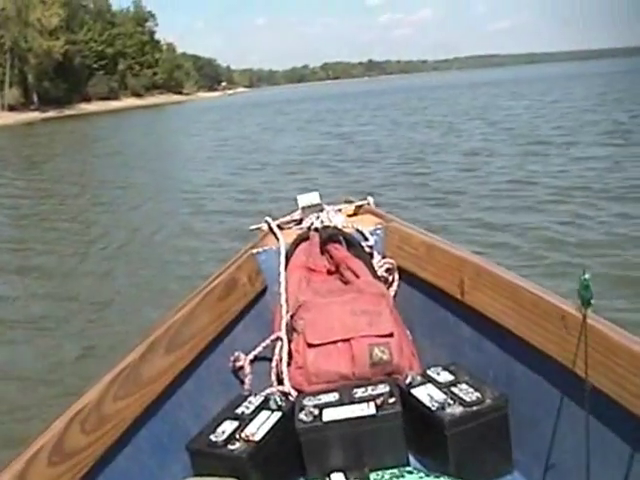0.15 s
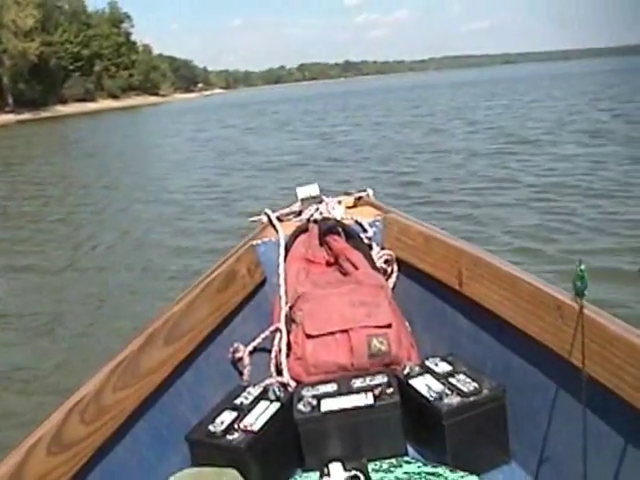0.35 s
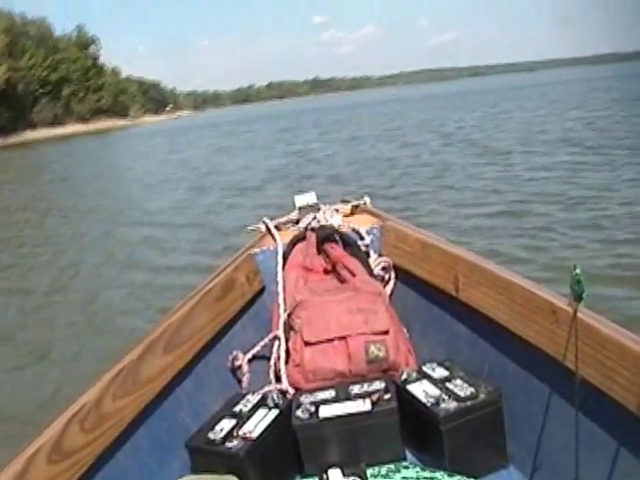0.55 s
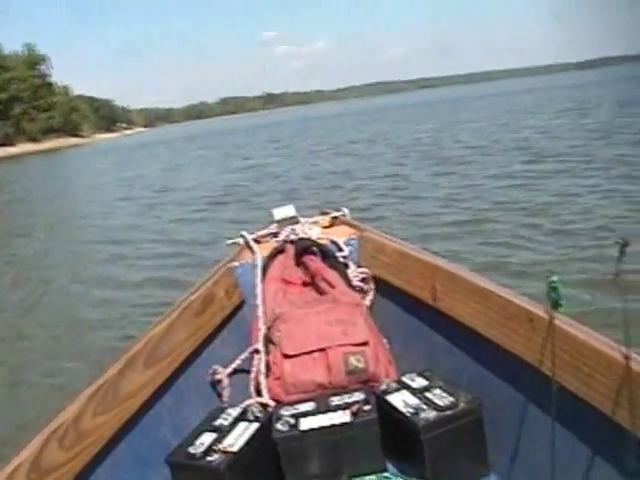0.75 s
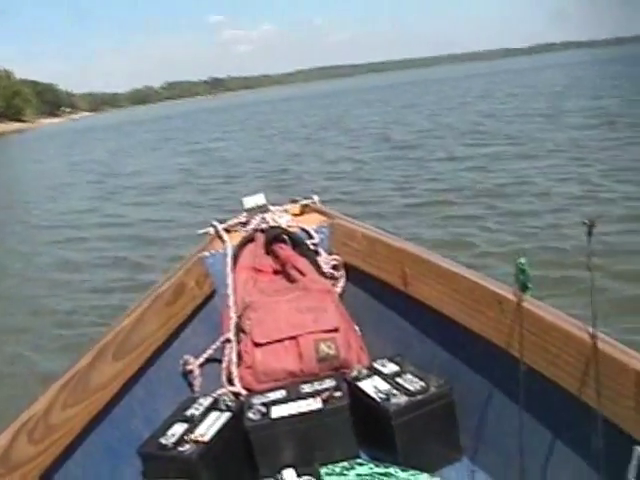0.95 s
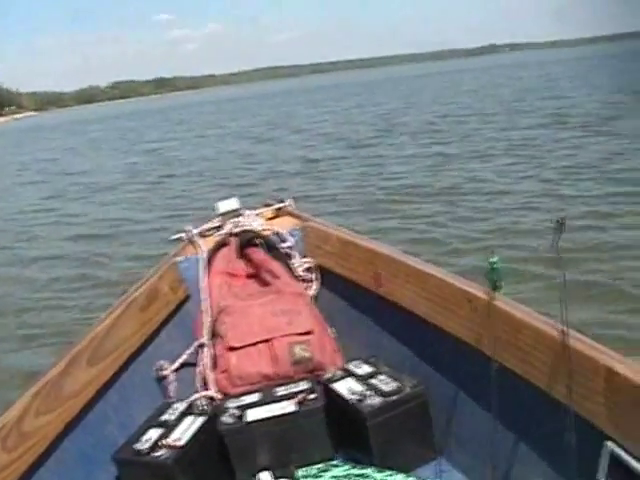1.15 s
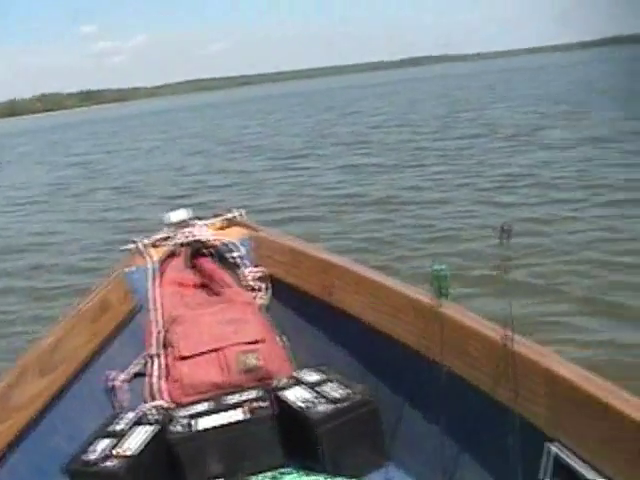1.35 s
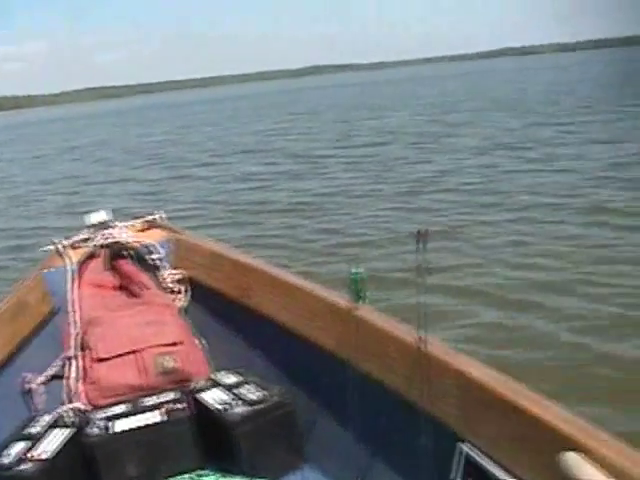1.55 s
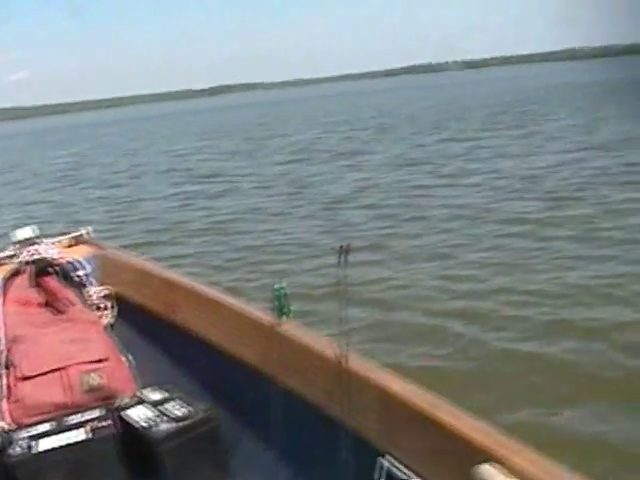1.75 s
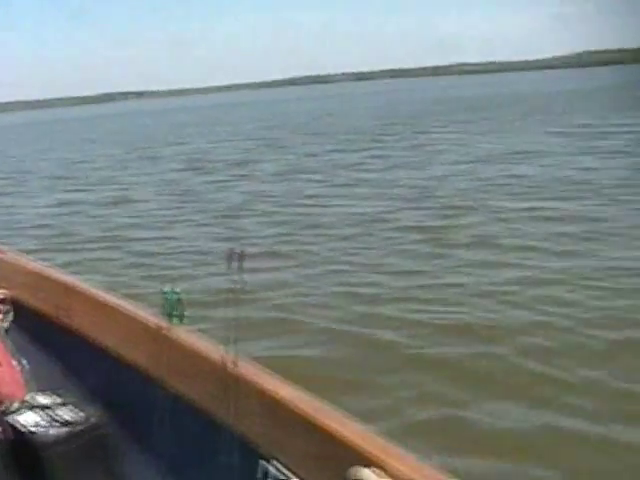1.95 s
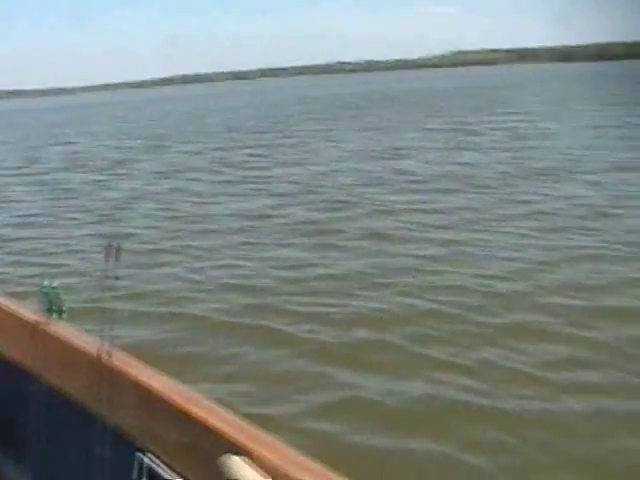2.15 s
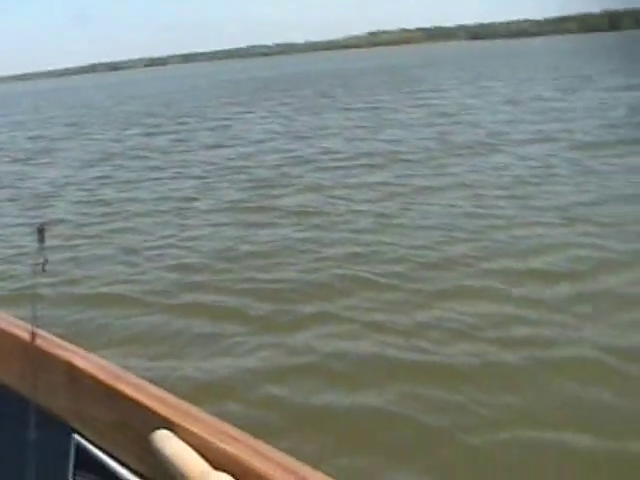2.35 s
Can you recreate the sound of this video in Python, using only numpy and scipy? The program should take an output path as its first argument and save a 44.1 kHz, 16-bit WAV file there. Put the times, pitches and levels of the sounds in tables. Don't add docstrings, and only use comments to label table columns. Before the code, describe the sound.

A small boat's electric outboard revs loudly, heard close in stereo outdoors. Soft hum and water wash come first, with wind slaps around 0.15-0.3 s. At about 0.3 s a harsh, rattling gear whine climbs fast, peaks at 0.4-0.6 s, then plunges, its metal housing ringing until about 1.2 s. Hull gurgles dot 0.8-2 s; wind fades and the steady hum grows slightly to the end.

```python
import sys
import numpy as np
from scipy import signal
from scipy.fft import rfft, irfft, next_fast_len
from scipy.io import wavfile
from scipy.ndimage import uniform_filter1d, map_coordinates

SR = 44100
rng = np.random.default_rng(int(sys.argv[2]) if len(sys.argv) > 2 else 0)


def inscribe(sig):
    pcm = np.round(np.clip(np.atleast_2d(sig).T, -1, 1) * 32767)
    wavfile.write(sys.argv[1], SR, pcm.astype(np.int16))


def linear_from_db(decibels):
    return 10 ** (np.asarray(decibels, float) / 20)


N = 105840
TIME = np.arange(N) / SR


def rms(x):
    return np.sqrt(np.mean(x ** 2) + 1e-20)


def unit(x):
    return x / rms(x)


def over_time(points, outside=None):
    s, value = np.transpose(points)
    return np.interp(TIME, s, value, left=outside, right=outside)


def over_pitch(points, hz):
    f, value = np.transpose(points)
    return np.interp(np.log(hz + 1), np.log(f + 1), value)


def wobble(rate):
    knots = rng.standard_normal(int(N * rate / SR) + 4)
    return map_coordinates(knots, [TIME * rate])


def filtered(x, response):
    m = next_fast_len(N + SR // 2)
    return irfft(rfft(x, m) * response(np.fft.rfftfreq(m, 1 / SR)), m)[..., :N]


def resonances(peaks):
    def response(f):
        total = 0
        for k, (centre, width, db) in enumerate(peaks):
            damping = 1j * f * width
            total = total + (-1) ** k * linear_from_db(db) * damping / (centre ** 2 - f ** 2 + damping)
        return total
    return response


def coloured(spectrum):
    return lambda f: linear_from_db(over_pitch(spectrum, f))


def noise(response, grain_db=0):
    grain = linear_from_db(grain_db * np.array([wobble(300), wobble(300)]))
    return unit(filtered(grain * rng.standard_normal((2, N)), response))


def tone(hz, db):
    phase = 2 * np.pi * np.cumsum(hz) / SR
    return linear_from_db(db) * np.sqrt(2) * np.sin(phase + np.array([[0], [np.pi / 2]]))


# pitch_hz, lead_radians
PORT_LEAD = [(700, 0), (1500, 0.41), (3000, 0.92), (4500, 0.26), (6200, 0.59)]


def spread(pair, alike, left_db):
    def mid_side(f):
        angle = np.arccos(np.clip(over_pitch(alike, f), -1, 1)) / 2
        return np.array([np.cos(angle), np.sin(angle)])

    def tilt(f):
        half = linear_from_db(over_pitch(left_db, f) / 2) * np.exp(.5j * over_pitch(PORT_LEAD, f))
        return np.array([half, 1 / half])

    mid, side = filtered(pair, mid_side)
    both = filtered(np.array([mid + side, mid - side]), tilt)
    return both / rms(both.mean(0)) * rms(pair[0])


# start_s, level_db
GEAR_EFFORT = [
    (.25, -56),
    (.282, -23.5),
    (.33, -17),
    (.385, -10.5),
    (.62, -12.5),
    (.72, -18.5),
    (.95, -28),
    (1.2, -38.5),
    (1.5, -58.5),
]
# start_s, pitch_hz
MOTOR_SPEED = [
    (.25, 450),
    (.34, 750),
    (.38, 812),
    (.42, 900),
    (.47, 968),
    (.595, 994),
    (.62, 830),
    (.665, 420),
    (.75, 200),
]
# pitch_hz, likeness
REV_ALIKE = [(300, .9), (900, .97), (2500, .9), (6000, .85), (8000, .4)]
# pitch_hz, level_db
REV_LEFT = [(400, 0), (1000, -1), (2400, 7.5), (5000, 7.5), (9000, 2)]


def rev():
    effort = linear_from_db(over_time(GEAR_EFFORT, -90) + .6 * wobble(20))
    speed = uniform_filter1d(over_time(MOTOR_SPEED), size=900)
    gears = housing() + gear_whistle(speed) + shaft_tones(speed)
    return spread(effort * gears + propeller() + bell() + flares(), REV_ALIKE, REV_LEFT)


# pitch_hz, width_hz, level_db
LOADED_MODES = [(1130, 24, -8), (1730, 43, -5), (2150, 35, -6), (2570, 45, -4), (2730, 49, -4),
                (3010, 62, -6), (3220, 38, -7), (3530, 37, -7), (3940, 33, -8), (4160, 35, -9),
                (4410, 61, -7), (5470, 47, -8), (5620, 35, -9), (6050, 67, -14)]
# pitch_hz, width_hz, level_db
COASTING_MODES = [(980, 15, -6), (1140, 41, -6), (1440, 35, -10), (1880, 37, -9), (2090, 42, -7),
                  (2540, 37, -8), (2720, 35, -7), (2990, 70, -11), (3630, 40, -16), (3940, 33, -14),
                  (4420, 55, -16), (5010, 28, -17), (5500, 76, -18), (6030, 44, -24)]
# pitch_hz, density_db
LOADED_RATTLE = [(180, -62.5), (300, -7.5), (536, -4), (801, -7), (972, 0), (1290, -8.5), (1690, -4.5),
                 (2990, -7), (6570, -16), (8540, -60), (14500, -120)]
# pitch_hz, density_db
COASTING_RATTLE = [(180, -39), (300, -15), (341, -17), (454, 0.5), (770, -15), (1120, 0.5), (1360, -0.5),
                   (4290, -11), (6570, -25.5), (8540, -70), (14500, -120)]
# start_s, end_s
UNLOADS = (.6, 0.74)
# start_s, end_s
BRIGHTENS = (.265, .34)


def housing():
    start, end = UNLOADS
    late = np.clip((TIME - start) / (end - start), 0, 1)

    def unload(loaded, coasting):
        before = np.sqrt(1 - late) * noise(loaded, grain_db=1)
        return before + linear_from_db(5) * np.sqrt(late) * noise(coasting, grain_db=2.5)

    ring = unload(resonances(LOADED_MODES), resonances(COASTING_MODES))
    rattle = unload(coloured(LOADED_RATTLE), coloured(COASTING_RATTLE))
    casing = linear_from_db(-4.5) * ring + linear_from_db(-2.5) * rattle
    bright = np.interp(TIME, BRIGHTENS, [0, 1])
    dull = filtered(casing, lambda f: 1 / (1 + (f / 2800) ** 2))
    return bright * casing + (1 - bright) * dull


# multiple of main tone, driven_db, coasting_db, roughness_hz, gain_db per decade of speed
SHAFT_TONES = [(1, -5, -36, 4, 100), (1.78, -24, -30, 8, 60), (3.04, -16, -15, 6, 120),
               (3.58, -10, -13, 8, 15), (4.62, -19, -19, 20, 30), (5.62, -19, -18, 40, 5),
               (5.8, -17, -16, 45, 0)]


def shaft_tones(speed):
    power_cut_s, release_s = .603, .013
    coast = np.clip((TIME - power_cut_s) / release_s, 0, 1)
    decades = np.log10(speed / speed.max())
    total = 0
    for order, driven_db, coasting_db, rough_hz, grow_db in SHAFT_TONES:
        hz = order * speed + rough_hz * wobble(60)
        db = driven_db + (coasting_db - driven_db) * coast
        db = db + (grow_db * (1 - coast) + 6 * coast) * decades
        db = db + 2.2 * wobble(30) + .45 * order * wobble(260)
        total = total + tone(hz, db)
    return total


# pitch_hz, density_db
WHISTLE = [(6000, -26), (6800, 6.5), (8600, -5.5), (10500, 1.5), (13000, -8.5), (15000, -34)]


def gear_whistle(speed):
    level_db, db_per_decade = -22, 23
    decades = np.log10(np.clip(speed / speed.max(), .6, 1))
    return linear_from_db(level_db + db_per_decade * decades) * noise(coloured(WHISTLE), grain_db=1.5)


# start_s, pitch_hz, level_db
PROPELLER_TONE = [
    (.33, 396, -34),
    (0.379, 449, -28),
    (.5, 534.3, -31),
    (.6, 545, -31),
    (.71, 532, -27),
    (.77, 449, -29.5),
    (.79, 422, -46),
]


def propeller():
    s, hz, db = np.transpose(PROPELLER_TONE)
    pitch = np.interp(TIME, s, hz) + 22 * wobble(70)
    return tone(pitch, np.interp(TIME, s, db, left=-90, right=-90) + 3 * wobble(50))


# pitch_hz, width_hz, level_db
BELL_MODE = [(1133, 30, 0)]
# start_s, level_db
BELL_STRENGTH = [
    (.26, -44),
    (.34, -29),
    (.39, -31),
    (.63, -31),
    (.665, -25),
    (.84, -27),
    (1.0, -31),
    (1.2, -34),
    (1.27, -44),
]


def bell():
    mode = resonances(BELL_MODE)
    return linear_from_db(over_time(BELL_STRENGTH, -90)) * noise(lambda f: mode(f) ** 2)


# start_s, end_s, pitch_hz, level_db
BRUSH_WHISTLE = (.375, .585, 7535, -38)
# start_s (its
# middle), pitch_hz, level_db, half_length_s
MODE_FLARES = [(.3, 1200, -30, .012), (.346, 1129, -14, 0.0083), (.428, 1128, -22, 0.0096),
               (.47, 1145, -25, .015), (.668, 1128, -12.5, 0.012), (0.81, 1135, -23, 0.011),
               (.746, 1138, -15.5, 0.01), (.775, 1135, -25, 0.0087), (.806, 1138, -18, .012),
               (0.9, 1500, -29, 0.0084), (.858, 1125, -22, .009), (.926, 1122, -23.5, 0.0098),
               (1.012, 1110, -26, .012), (1.09, 1130, -29.5, 0.019), (1.138, 1130, -27, 0.01),
               (1.172, 1130, -26, .015), (1.21, 1132, -27, 0.013), (0.329, 2400, -24, 0.037),
               (0.389, 2572, -22.5, .02), (.325, 2155, -29, .02), (0.403, 2146, -20, .025),
               (0.338, 2500, -27, 0.014), (.412, 1722, -23, .016), (0.472, 1722, -15, 0.029),
               (.56, 1738, -26, .025), (0.396, 3010, -22, 0.024), (0.515, 2975, -17, 0.018),
               (.565, 3015, -16, .035), (.368, 4417, -20, 0.017), (0.467, 3941, -19, 0.018),
               (.615, 3942, -19.5, 0.02), (0.761, 3934, -26.5, 0.04), (.645, 2546, -22, .025),
               (.645, 2710, -23, 0.0179), (.73, 2715, -24, 0.0244), (.67, 1530, -23.5, 0.0213),
               (.5, 1700, -26, .025), (.67, 2165, -21, .018), (.82, 2090, -26, 0.032),
               (.83, 5010, -36, .05), (.85, 978, -30, 0.085), (.31, 119, -25.5, .05), (.69, 121, -33, .06),
               (1.0, 985, -34, .06), (1.24, 2210, -40, 0.028)]


def flares():
    unsteady_hz, unsteady_db = 7 * wobble(50), 1.26 * wobble(90)
    start, end, brush_hz, brush_db = BRUSH_WHISTLE
    powered = uniform_filter1d(1. * (TIME > start) * (TIME < end), size=1500)
    out = powered * tone(brush_hz + unsteady_hz, brush_db + unsteady_db)
    for s, hz, db, half in MODE_FLARES:
        near = abs(TIME - s) < 3 * half
        shift = rng.integers(N)
        pitch = hz + np.roll(unsteady_hz, shift)[near]
        level = db + np.roll(unsteady_db, shift)[near]
        out[:, near] += np.exp(-((TIME[near] - s) / half) ** 2) * tone(pitch, level)
    return out


# start_s, level_db
RUNNING_LOAD = [(0, -1.5), (.7, -3.5), (1.1, -3), (1.5, -2), (1.8, 0.5), (2.4, 1.5)]
# pitch_hz, level_db
RUNNING_LINES = [(70.0, -50), (140.0, -52), (209.9, -52), (344.5, -43), (621, -36.5), (1039, -45),
                 (1873, -59)]
# pitch_hz, width_hz, level_db
HULL_MODES = [(345, 40, -8), (610, 80, -4), (1150, 120, -14), (1440, 60, -18), (1878, 24, -16),
              (2130, 57, -22)]
# pitch_hz, density_db
WATER_WASH = [(25, -32), (70, -18), (240, -12.5), (450, -6.5), (700, -7.5), (1300, -17.5), (6570, -33.5),
              (8500, -70)]
# pitch_hz, density_db
MIC_HISS = [(5500, -9), (6800, 0), (9000, -3.5), (12000, -6), (14500, -14), (15500, -30)]
# pitch_hz, likeness
HULL_ALIKE = [(100, .6), (400, .97), (1000, .95), (2500, .75), (6000, .5), (8000, .3)]
# pitch_hz, level_db
HULL_LEFT = [(800, -1), (2400, 4.5), (6000, 2)]


def hum():
    load = linear_from_db(over_time(RUNNING_LOAD))
    lines = 0
    for hz, db in RUNNING_LINES:
        pitch = hz * (1 + .011 * (TIME - 1.9) + .005 * wobble(30))
        lines = lines + tone(pitch, db + 1 + 2.5 * wobble(45))
    rings = linear_from_db(-38 + 1.3 * wobble(6)) * noise(resonances(HULL_MODES))
    wash = linear_from_db(-33 + .62 * wobble(.79) + .31 * wobble(13.25)) * noise(coloured(WATER_WASH))
    hiss = linear_from_db(-55.5) * noise(coloured(MIC_HISS))
    return spread(load * rings + wash + load * lines + hiss, HULL_ALIKE, HULL_LEFT)


# start_s, pitch_hz, level_db, life_s
HULL_BUBBLES = [
    (.064, 5300, -38, .003),
    (.782, 480, -19, .007),
    (1.154, 600, -22, .005),
    (1.182, 255, -19, .02),
    (1.313, 300, -25, .008),
    (1.322, 560, -27, .01),
    (1.644, 540, -23, .004),
    (2.04, 360, -28, .015),
]


def bubbles():
    out, t = np.zeros(N), np.arange(SR // 8) / SR
    for s, hz, db, life in HULL_BUBBLES:
        age = t / life
        swell = 2.03 * age * np.exp(-age * age)
        pocket = swell * np.sin(2 * np.pi * hz * t * (1 + .3 * age / 2))
        out[round(s * SR):][:len(t)] += linear_from_db(db) * pocket
    return out


# start_s, level_db
GUSTS = [(0.0, -27), (0.04, -28.5), (0.07, -34.5), (0.15, -24.5), (0.33, -20), (0.51, -38), (0.59, -25.5),
         (0.61, -33.5), (0.71, -20.5), (0.79, -39), (0.94, -25.5), (1.16, -43.5), (1.18, -33), (1.36, -36),
         (1.51, -61), (2.1, -41), (2.33, -48), (2.4, -72)]
# pitch_hz, density_db
PORT_RUMBLE = [(15, -32), (40, -16), (110, 3), (250, -0.5), (500, -8), (1000, -17), (2500, -40),
               (5000, -90)]
# pitch_hz, width_hz, level_db
HULL_BOOM = [(119.6, 9.1, 0)]


def wind():
    lumps = linear_from_db(3 * np.array([wobble(30), wobble(30)]))
    rumble = unit(lumps * noise(coloured(PORT_RUMBLE)))
    boom = linear_from_db(-12) * noise(resonances(HULL_BOOM))[0]
    return linear_from_db(over_time(GUSTS) + 2) * (rumble + boom) + slaps()


# start_s (its middle), left_db, right_db, pitch_hz
WIND_SLAPS = [(.151, -10, -13, 300), (.169, -4, -10, 260), (.173, -14, -7, 550), (.207, -10, -18, 250),
              (.223, -10, -9, 400), (.232, -6, -3, 620), (.244, -11, -16, 250), (.263, -16, -9, 400),
              (.281, -6, -14, 250), (.286, -18, -7, 230), (.318, -8, -14, 300), (.321, -16, -5, 200)]


def slaps():
    before_s = .008
    out, t = np.zeros((2, N)), np.arange(800) / SR - before_s
    dull = signal.butter(3, 1100, fs=SR, output="sos")
    for s, left_db, right_db, hz in WIND_SLAPS:
        phase = rng.uniform(0, 6, (2, 1))
        push = np.exp(-(t * hz / .65) ** 2) * np.sin(2 * np.pi * hz * t + phase)
        grit = unit(signal.sosfilt(dull, rng.standard_normal((2, len(t)))))
        crack = .2 * np.exp(-(t / .0015) ** 2) * grit
        level = linear_from_db(np.array([[left_db], [right_db]]))
        out[:, round((s - before_s) * SR):][:, :len(t)] += level * (push + crack)
    return out


def scene():
    return rev() + hum() + bubbles() + wind()


def roll_off(x):
    return signal.sosfilt(signal.butter(12, 15200, fs=SR, output="sos"), x)


def record(dry):
    mix = dry / (1 + abs(dry / 1.22) ** 5) ** (1 / 5)
    return roll_off(mix)


dry = scene()
out = record(dry)
inscribe(out)
```